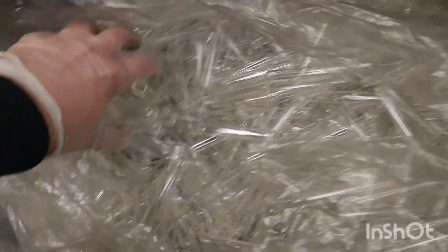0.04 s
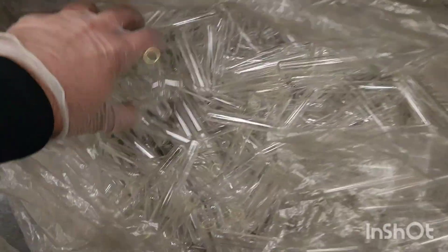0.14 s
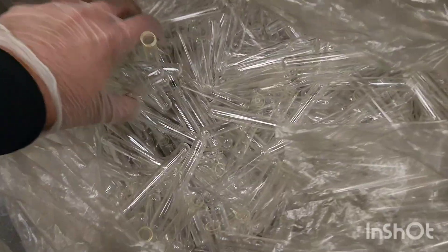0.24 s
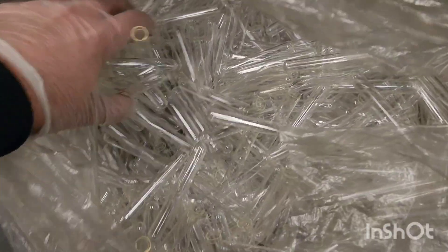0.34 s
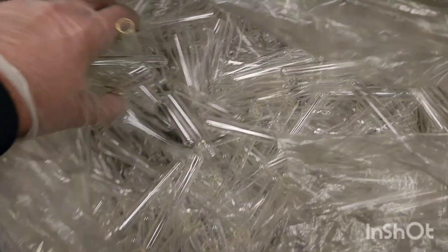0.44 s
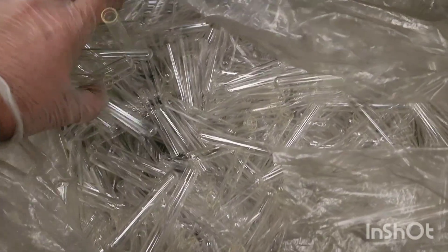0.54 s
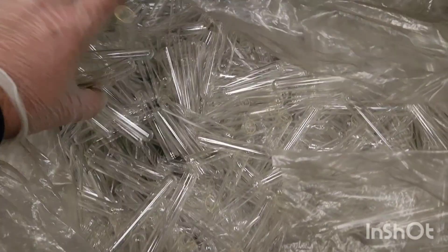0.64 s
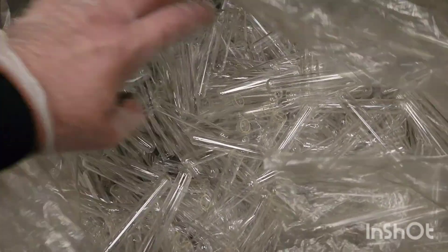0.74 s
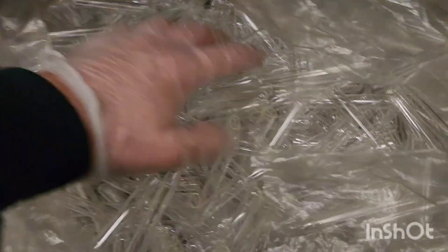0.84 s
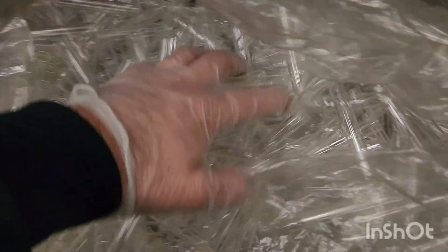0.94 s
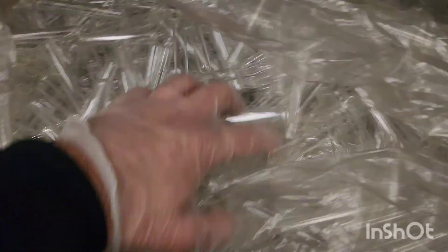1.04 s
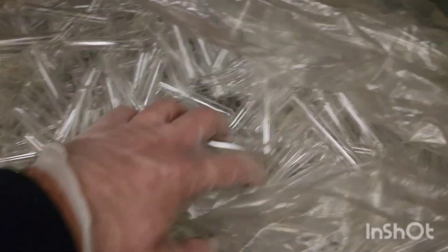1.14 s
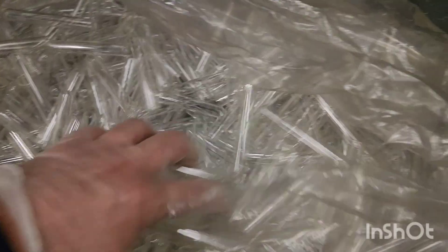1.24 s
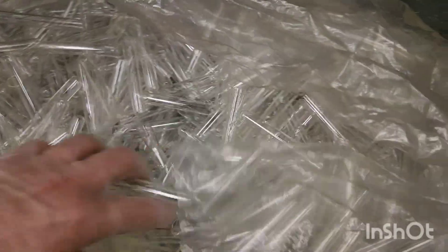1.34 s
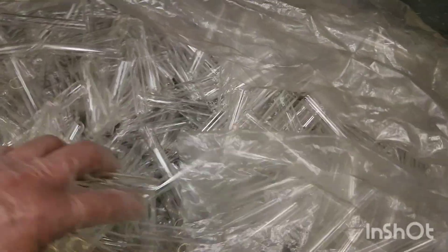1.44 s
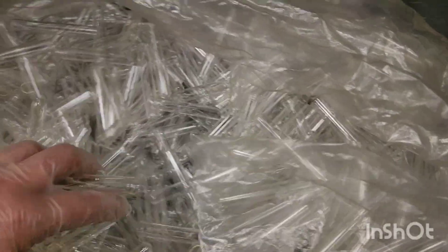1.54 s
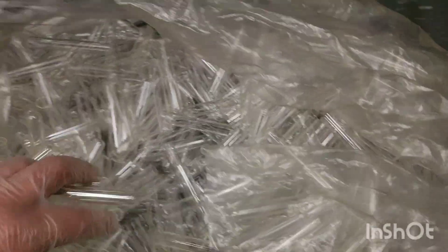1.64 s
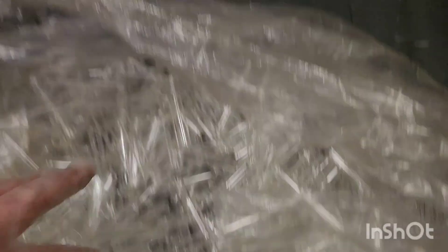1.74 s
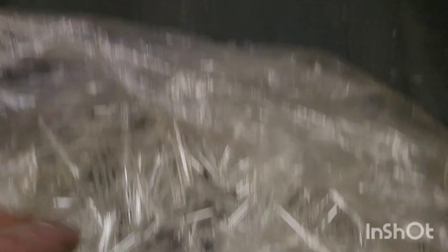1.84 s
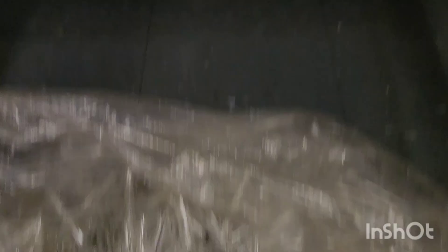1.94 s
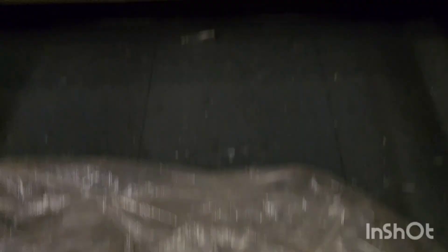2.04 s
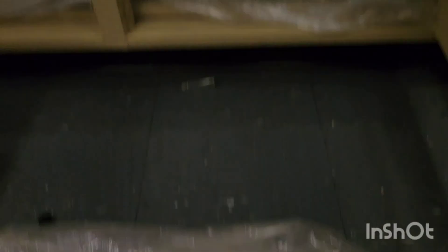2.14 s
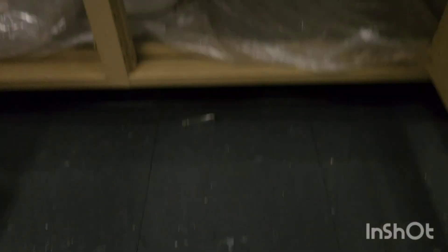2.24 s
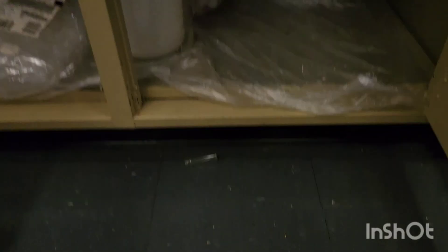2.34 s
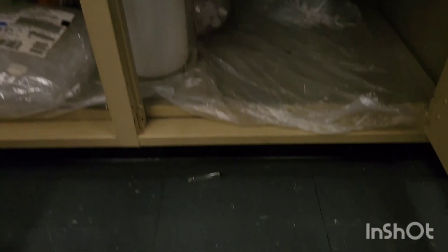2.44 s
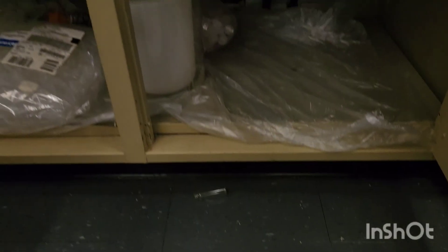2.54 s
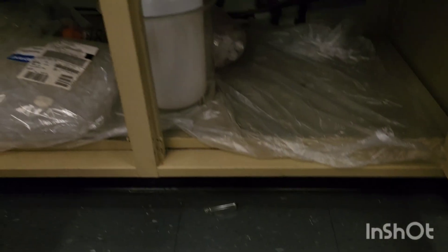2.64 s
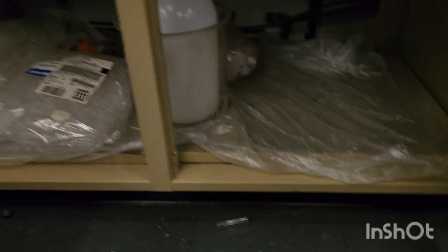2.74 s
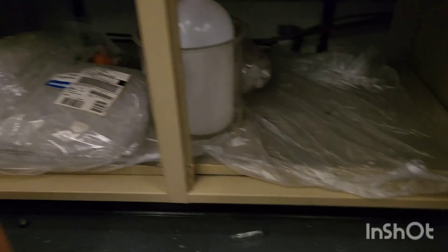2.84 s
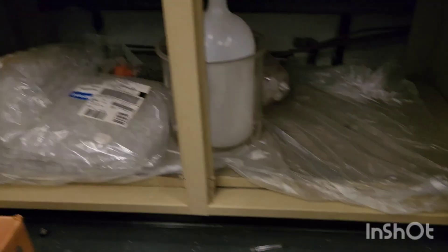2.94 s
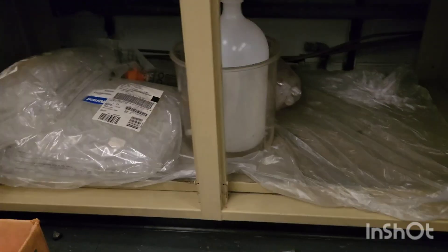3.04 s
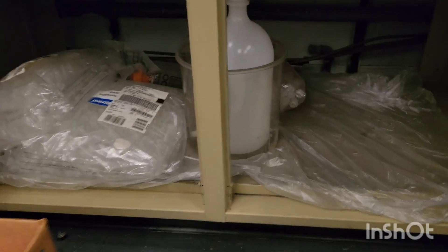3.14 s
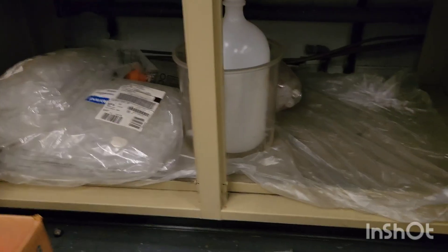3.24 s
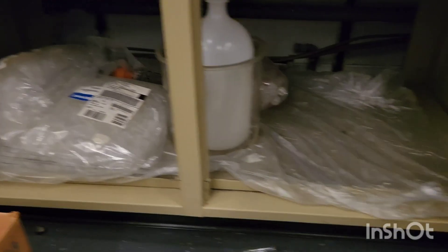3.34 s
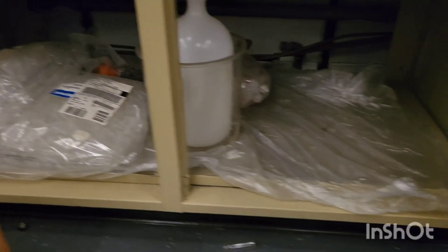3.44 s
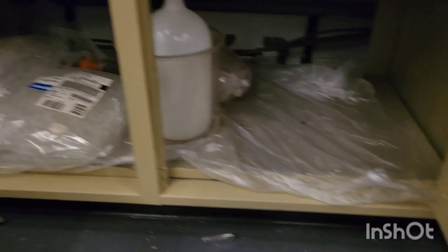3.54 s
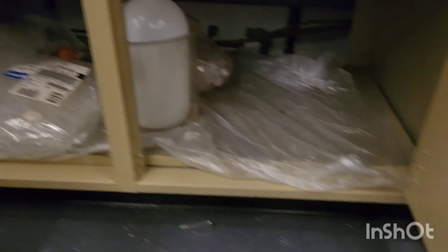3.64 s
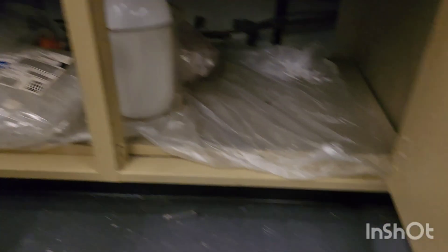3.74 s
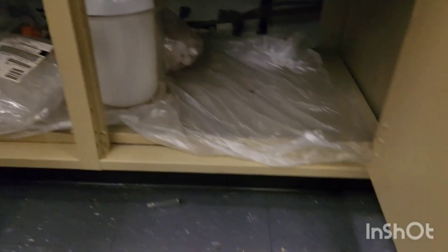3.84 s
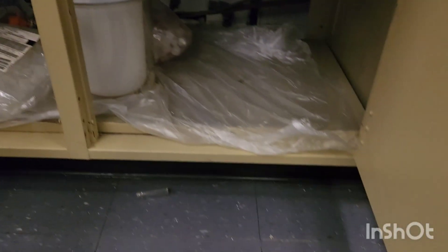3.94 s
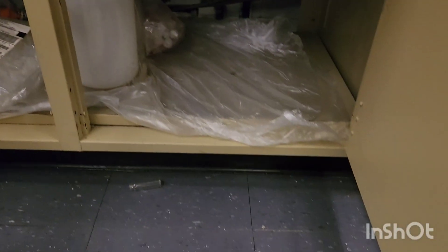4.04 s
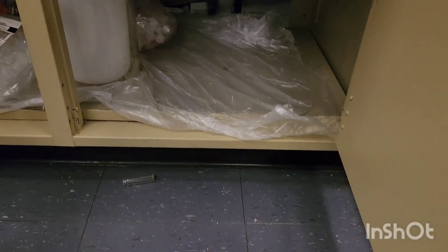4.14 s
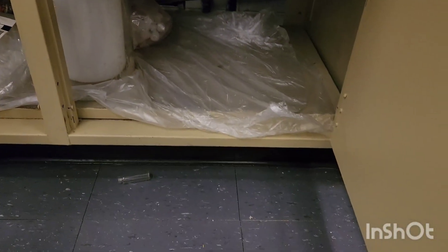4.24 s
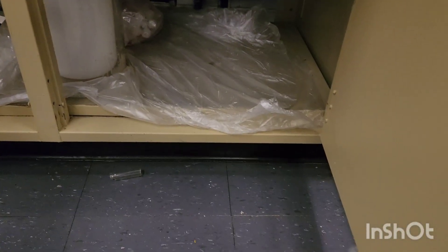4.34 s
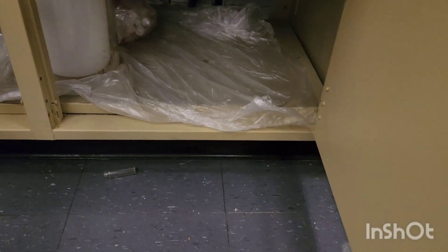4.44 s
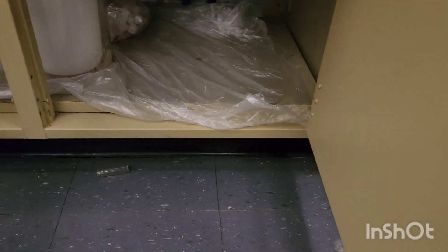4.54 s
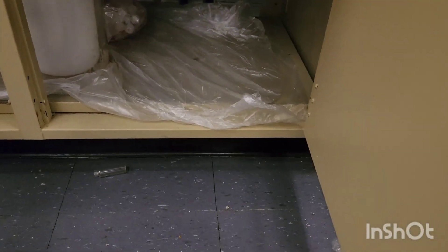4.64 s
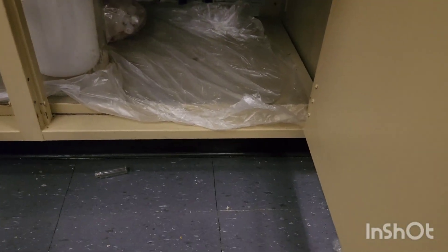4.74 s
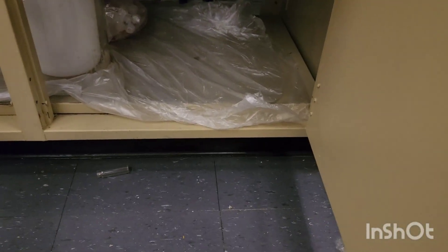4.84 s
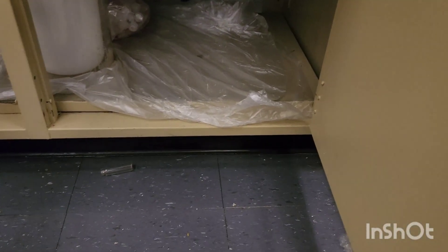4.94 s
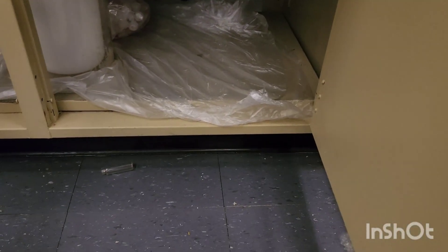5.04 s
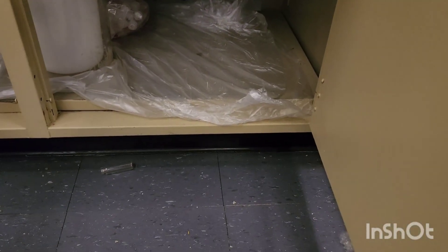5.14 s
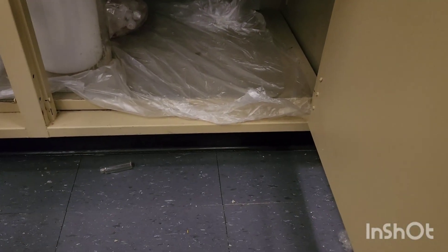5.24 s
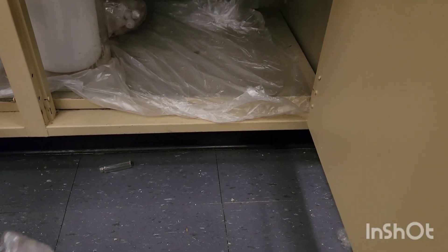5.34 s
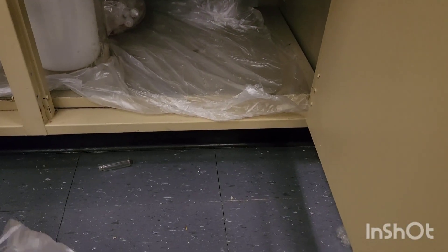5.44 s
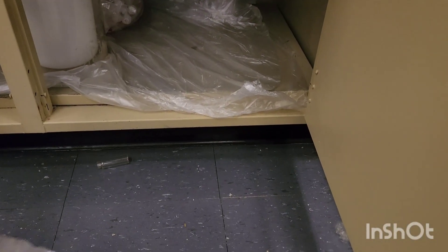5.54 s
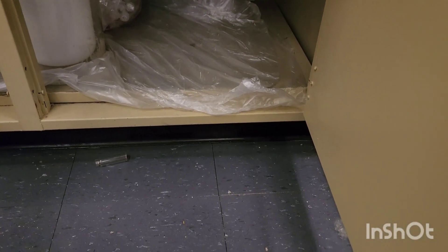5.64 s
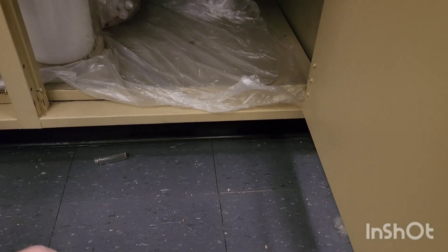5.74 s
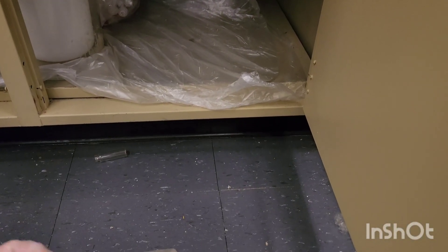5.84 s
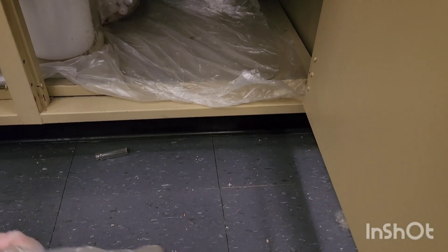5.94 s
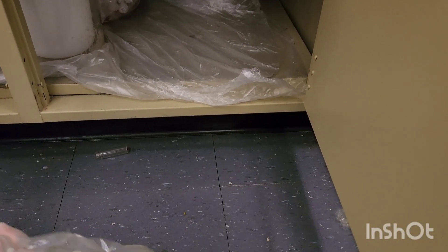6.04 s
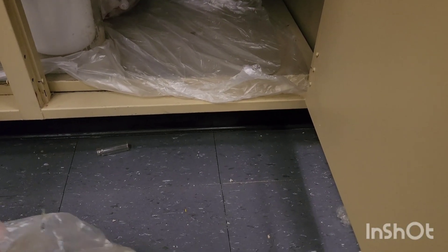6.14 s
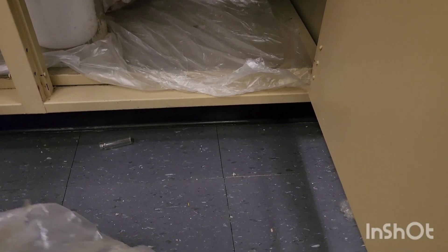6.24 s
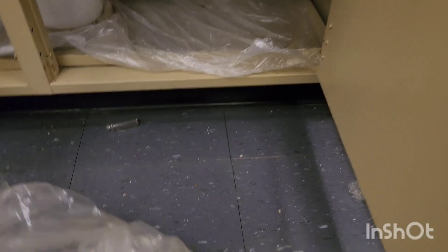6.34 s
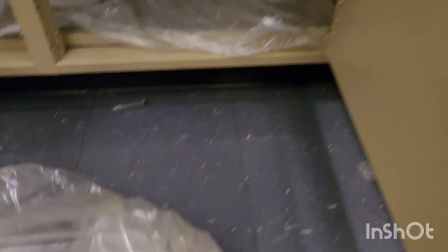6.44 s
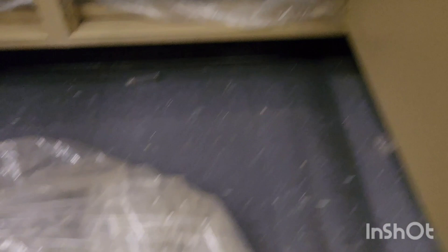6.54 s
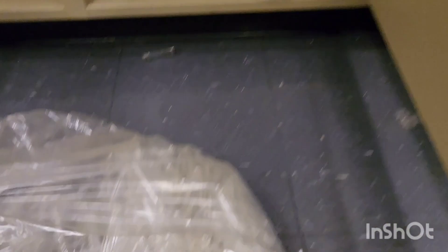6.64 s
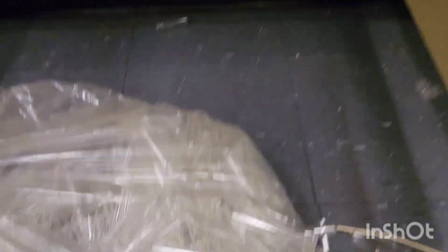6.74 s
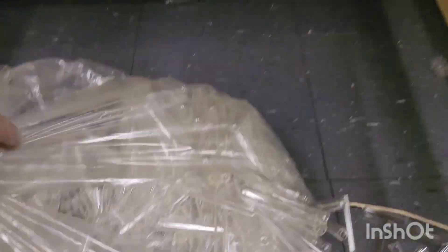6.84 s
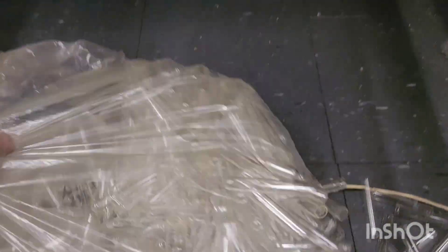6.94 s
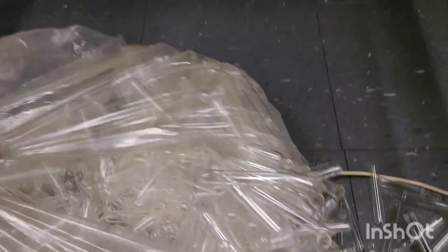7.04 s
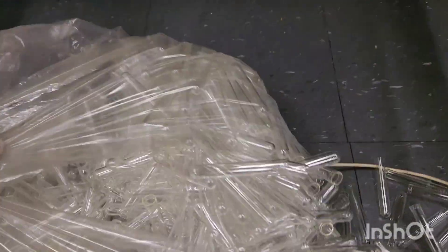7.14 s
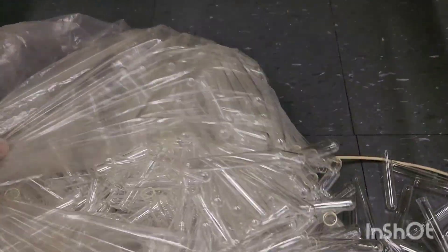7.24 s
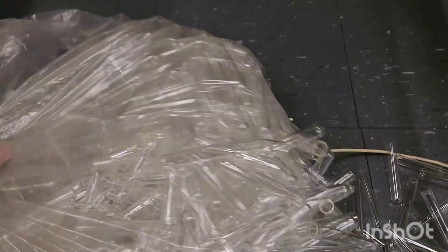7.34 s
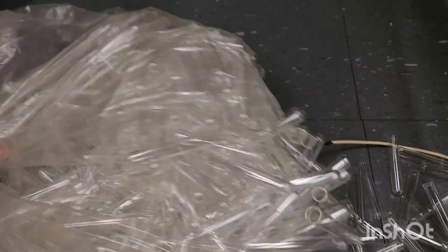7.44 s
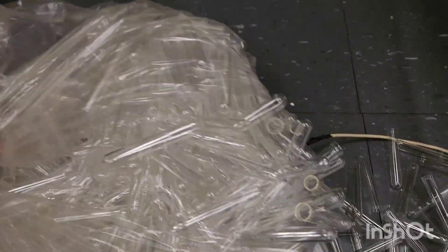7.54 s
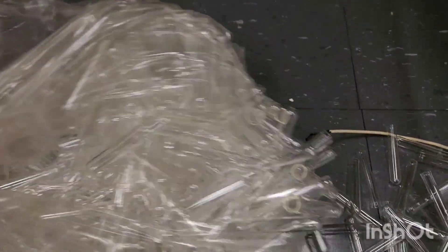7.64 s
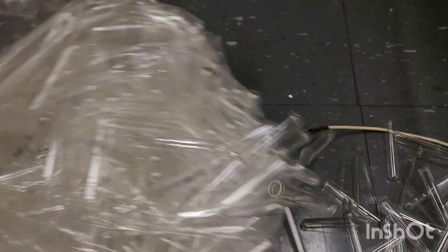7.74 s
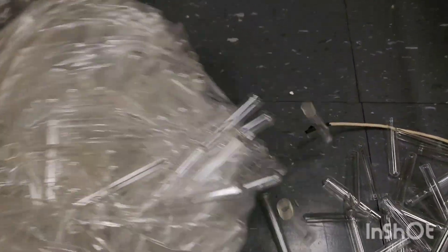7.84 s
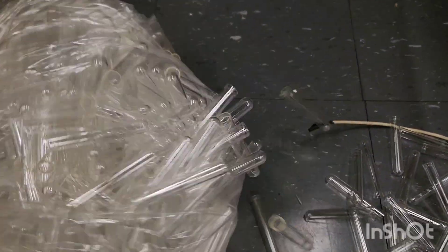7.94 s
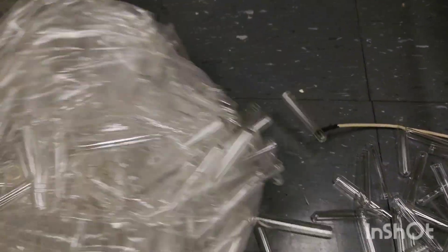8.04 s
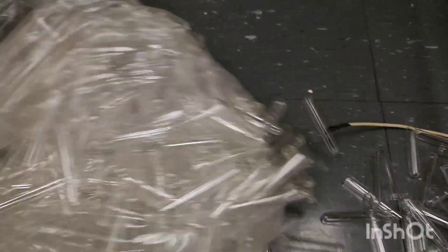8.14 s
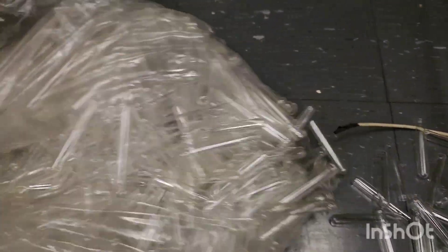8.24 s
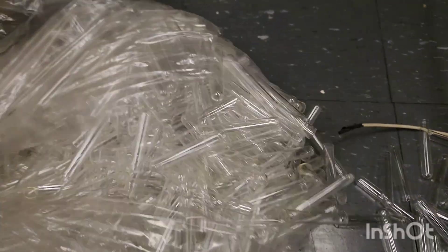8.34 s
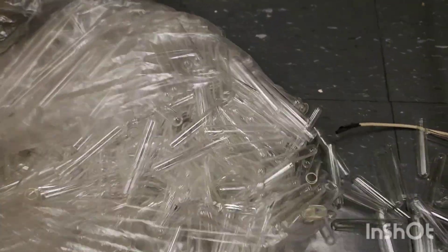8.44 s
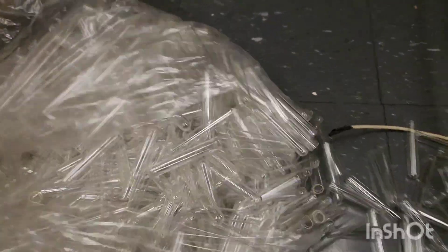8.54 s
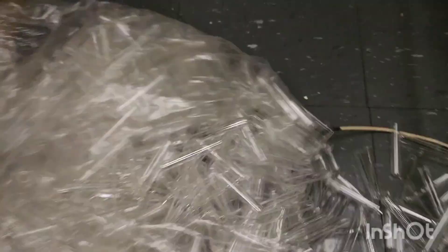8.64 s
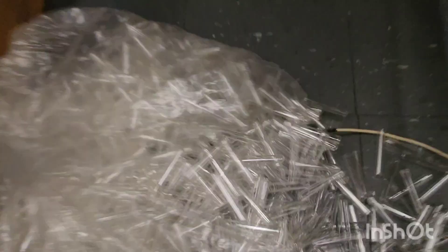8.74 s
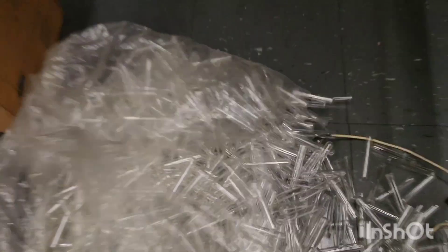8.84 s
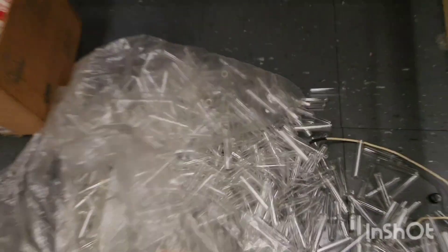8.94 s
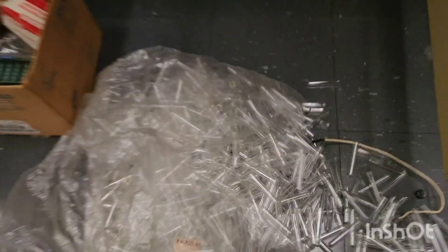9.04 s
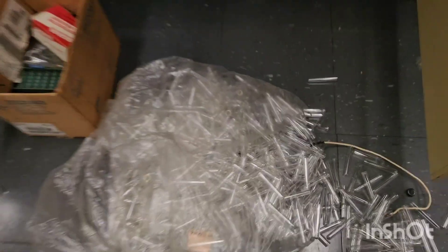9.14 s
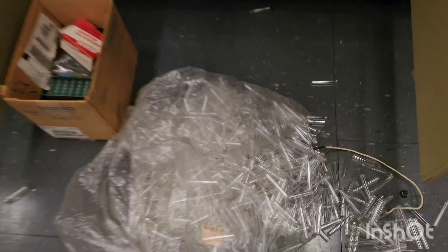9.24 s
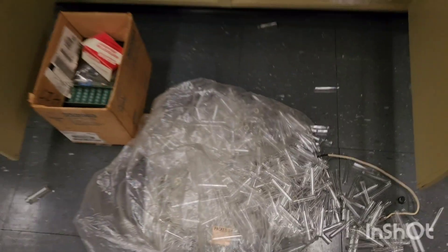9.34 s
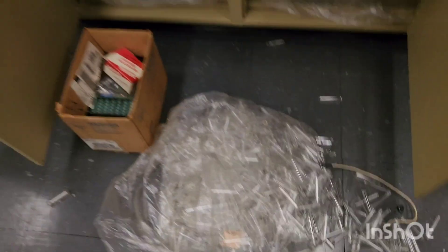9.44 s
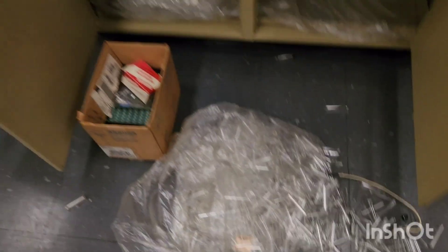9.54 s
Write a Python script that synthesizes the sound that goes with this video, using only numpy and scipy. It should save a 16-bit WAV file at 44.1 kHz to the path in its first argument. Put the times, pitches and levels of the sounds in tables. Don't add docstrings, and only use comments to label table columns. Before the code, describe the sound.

Bright, dense glassy rattling and plastic crinkle in two bouts, split by a quiet gap with soft taps and cloth swishes.

```python
import sys
import numpy as np
from scipy import signal
from scipy.io import wavfile
from scipy.ndimage import uniform_filter1d

SR = 44100
rng = np.random.default_rng(int(sys.argv[2]) if len(sys.argv) > 2 else 0)


def digitize_waveform(pressure):
    field = np.atleast_2d(pressure).T
    bounded = np.clip(field, -1, 1)
    quanta = np.round(bounded * 32767).astype(np.int16)
    wavfile.write(sys.argv[1], SR, quanta)


def convert_level_to_amplitude(level_db):
    exponent = np.asarray(level_db, float) / 20
    return 10 ** exponent


N = 423360
TIME = np.arange(N) / SR
HZ = np.fft.rfftfreq(4096, 1 / SR)

# [t/s, blow level/dB, crunch of film level/dB]
STIRRING = [(.0393, -14.5, -33), (.0627, -19, -27), (.1286, -5, -31), (.3176, -23.5, -23),
            (.3581, -23, -12.5), (.3813, -9, -21), (.458, -20, -15.5), (.4878, -20.5, -11),
            (.5179, -10.5, -21.5), (.538, -8, -48), (.5643, -11, -24), (.712, -26, -17),
            (.7263, -13.5, -21.5), (.7672, -13, -25), (.8056, -7.5, -28), (.9133, -16, -6.5),
            (1.0796, -17, -43), (1.1651, -11.5, -20), (1.247, -16.5, -12.5), (1.3083, -19, -8.5),
            (1.4837, -14.5, -16), (1.6821, -12.5, -24), (1.8145, -17.5, -17), (1.9072, -18.5, -24.5),
            (1.972, -24, -25)]
SETTLING = [(2.013, -33, -16), (2.0222, -30.5, -20), (2.115, -26.5, -20), (2.261, -51, -5),
            (2.3399, -32, -14.5), (2.378, -29.5, -21), (2.4205, -35, -26), (2.467, -41, -8),
            (2.482, -34.5, -17.5), (2.5187, -36.5, -17), (2.5615, -32, -17), (2.72, -45.5, -15),
            (2.757, -50, -12), (2.85, -40, -26), (3.3393, -41.5, -18), (3.435, -46.5, -15),
            (3.7612, -18, -15.5), (3.7868, -17.5, -11.5), (3.813, -18, -14), (3.8754, -17.5, -16.5),
            (3.974, -26, -22), (4.0417, -30, -16), (4.0853, -25, -11), (4.108, -21.5, -20),
            (9.1994, -51, -16), (9.262, -39, -29), (9.42, -48, -13), (9.549, -53, -12)]
GATHERING = [(4.507, -23.5, -30), (4.672, -21, -29), (4.7078, -25, -6.5), (4.799, -24, -20),
             (4.901, -11.5, -22.5), (5.011, -10, -27.5), (5.206, -26.5, -2.5), (5.23, -13.5, -14),
             (5.3305, -15, -23), (5.4784, -13, -13.5), (5.525, -5, -28), (5.799, -28, -34),
             (5.832, -18, -20), (5.8882, -9, -33), (5.988, -19.5, -11.5), (6.0032, -6.5, -27),
             (6.026, -6.5, -24), (6.0826, -10, -22), (6.1128, -6.5, -27), (6.2154, -7.5, -37),
             (6.3101, -8.5, -27), (6.5194, -34, -36)]
HAULING = [(6.7905, -8.5, -25), (6.9424, -13.5, -18), (7, -22, -12), (7.0962, -19, -18), (7.1204, -8, -29),
           (7.292, -18.5, -12.5), (7.324, -13, -20), (7.409, -32, -27), (7.426, -11, -40),
           (7.508, -15.5, -26), (7.6453, -21, -10.5), (7.7377, -27, -28), (7.876, -12, -17),
           (7.939, -14.5, -22), (8.0293, -13, -17), (8.094, -20, -19), (8.2127, -17.5, -47),
           (8.3905, -15, -32), (8.5188, -15, -23), (8.568, -20, -19), (8.613, -25, -15),
           (8.6558, -11.5, -27), (8.951, -43, -36)]
JOLTS = STIRRING + SETTLING + GATHERING + HAULING
# [f/Hz, spread between tubes/Hz, t60/s]
TUBE_MODES = [(1065, 45, .028), (4180, 22, .07), (4320, 110, .016), (4700, 260, .009), (7020, 90, .025),
              (8740, 110, .025), (9625, 40, .045), (10080, 120, .02), (11930, 130, .025), (12830, 70, .03),
              (14860, 90, .03), (15715, 35, .04), (6300, 400, .004), (7700, 450, .004), (10900, 550, .004),
              (12400, 250, .005), (15300, 250, .005)]
# [t/s, brightness level/dB]
FACING = [(0.0, 1), (.9, 4.5), (1.3, 5), (2.1, 3.5), (2.5, 1), (3.8, -2.5), (4.4, -2.5), (5.0, -3.5),
          (5.45, -3), (5.9, 3), (6.7, 3), (6.95, -5), (7.9, -3), (8.1, 2.5), (9.0, 5), (9.6, -6)]


def evened(x):
    return x / np.sqrt(np.mean(x ** 2) + 1e-20)


def read(points, hz):
    f, value = np.transpose(points)
    return np.interp(np.log(hz + 1), np.log(f + 1), value)


def add(mix, s, sound):
    part = mix[:, round(s * SR):][:, :sound.shape[1]]
    part += sound[:, :part.shape[1]]


def causal(db, size=1024):
    log_gain = np.log(convert_level_to_amplitude(np.r_[db, db[-2:0:-1]]))
    return np.fft.ifft(np.exp(np.conj(signal.hilbert(log_gain)))).real[:size]


def brightness_db(t):
    return np.interp(t, *np.transpose(FACING))


def effort_db(glass):
    # [full effort from t/s, held for/s, film crackle level/dB, glass rattle level/dB]
    strokes = [(0.0, 0.22, -32.5, -32), (0.389, 0.0043, -41, -45), (.53, 0.0091, -33, -44),
               (.72, 0.035, -35.5, -24.5), (0.954, 0.15, -26.5, -16), (1.288, 0.13, -28.5, -17.5),
               (1.52, 0.037, -34, -24), (1.72, 0.06, -35, -18.5), (2.0, 0.092, -61, -49),
               (2.94, 0.081, -64, -73), (3.5, .2, -79, -78), (3.792, 0.087, -44, -54),
               (3.95, 0.11, -38.5, -39), (4.2, 0.095, -71, -67), (4.452, 0.088, -35, -55),
               (4.749, 0.1, -29, -26), (4.98, 0.13, -35, -32), (5.252, .4, -28.5, -22.5),
               (5.799, 0.16, -26, -17.5), (6.102, .5, -30, -21), (6.896, 0.23, -25, -18),
               (7.349, 0.073, -26, -21), (7.75, 0.12, -27.5, -25), (8.04, 0.16, -28, -18.5),
               (8.598, 0.16, -31.5, -17), (8.92, 0.025, -39, -24), (9.138, 0.0047, -44.5, -31),
               (9.29, 0.015, -76, -58)]
    start, held, film_db, glass_db = np.array(strokes).T[:, :, None]
    swell_s, ease_s = (0.15 * 0.93, 0.1) if glass else (0.15, 0.1)
    peak_db, steepness, rest_db = (glass_db, 1.29, -77) if glass else (film_db, 1.0, -64.5)
    t = np.arange(0, N + 256, 128) / SR
    before = np.maximum(start - t, 0) / swell_s
    after = np.maximum(t - start - held, 0) / ease_s
    fall_db = 10 * steepness * (before + after) ** 0.94
    power = convert_level_to_amplitude(2 * (peak_db - fall_db)).sum(0) + convert_level_to_amplitude(2 * rest_db)
    return np.interp(TIME, t, 10 * np.log10(power))


def air():
    # [f/Hz, level per Hz/dB]
    air_spectrum = [(12, -52), (25, -4), (50, 3), (75, -2), (146, -5.5), (234, -12), (388, -12), (542, -17),
                    (660, -17.5), (2670, -29.5), (4300, -51), (6720, -33.5), (12100, -43), (16000, -29)]
    # [f/Hz, likeness 0 to 1]
    coherence = [(30, .92), (60, .8), (125, .66), (240, .55), (950, .3), (15000, 0.0)]
    # [t/s, level/dB]
    tremor = [(0.0, -49.5), (1.7, -54), (2.2, -50.5), (4.5, -52.5), (5.099, -54), (7.7, -49.5),
              (8.4, -56.5), (9.5, -57.5), (9.6, -45)]
    frames, hz = N // 256 + 5, np.fft.rfftfreq(1024, 1 / SR)
    a, b, c, d, patches = rng.standard_normal((frames, 513, 5)).T
    patches = evened(uniform_filter1d(uniform_filter1d(patches, 8, 0), 12, 1))
    same = np.clip(read(coherence, hz), -1, 1)[:, None]
    left = a + 1j * b
    right = same * left + np.sqrt(1 - same ** 2) * (c + 1j * d)
    when = np.arange(frames) * 256 / SR
    rumble_db = np.interp(when, *np.transpose(tremor)) + 54.5
    grip_db = 2.0 + 0.34 * (np.interp(when - .012, TIME, effort_db(glass=0)) + 37.0)
    low = np.exp(-(hz / 130) ** 4)[:, None]
    grip = np.exp(-np.log((hz + 1) / 230) ** 2 / .5)[:, None]
    lift_db = low * rumble_db + (1 - low) * grip * grip_db
    level_db = read(air_spectrum, hz)[:, None] + (4.5 - 2.5 * low) * patches + lift_db
    z = np.array([left, right]) * convert_level_to_amplitude(level_db)
    return convert_level_to_amplitude(6.5) * signal.istft(z, nperseg=1024, noverlap=768)[1][:, :N] / 1024


def room(x, t60=0.052, count=500, size=4):
    out, turn = np.zeros_like(x), TIME * 3
    for k in range(size):
        taps = np.zeros((2, 22 * count + 100))
        at = 90 + 22 * np.arange(count) + rng.integers(0, 22, (2, count))
        echoes = rng.choice([-1., 1.], at.shape) * convert_level_to_amplitude(-60 * at / SR / t60)
        np.put_along_axis(taps, at, echoes, 1)
        share = np.cos(np.pi / 2 * np.clip(abs((turn - k) % size - 1), 0, 1))
        out += signal.oaconvolve(x * share, taps / np.linalg.norm(taps[0]), axes=1)[:, :N]
    return out


def sleeve():
    # [t/s, length/s, level/dB]
    brushes = [
        (2.62, 0.051, -55),
        (2.92, 0.079, -42.5),
        (3.148, 0.039, -42),
        (3.192, 0.046, -44),
        (3.649, 0.18, -44),
        (4.311, 0.088, -43),
        (4.415, 0.12, -30),
    ]
    out = np.zeros((2, N))
    for s, length, db in brushes:
        shape = signal.windows.tukey(round(length * SR), .8)
        add(out, s, convert_level_to_amplitude(db) * shape * rng.standard_normal((2, 8000))[:, :len(shape)])
    return out


def handling():
    # [t/s, tick level/dB, thump level/dB, nail snap level/dB]
    touches = [(2.196, -35, -40, -13), (2.377, -32, -59, 3), (2.671, -39.5, -50, -30),
               (2.904, -31, -49, -26), (2.923, -27, -36, -3), (2.956, -37, -56, -5),
               (2.96, -23.5, -43, -25), (2.987, -30, -50, -18), (3.058, -35, -43, -21),
               (3.081, -29, -43, -32), (3.162, -28, -38, -22), (3.538, -40, -65, -47),
               (3.585, -28, -55, -48), (3.617, -21.5, -57, -30), (3.7637, -9, -37, -23),
               (4.193, -17.5, -47, -31), (4.246, -19.5, -31, -9), (4.574, -11, -30.5, 4),
               (4.923, -15, -48, -16), (6.463, -13, -29.5, -17), (8.55, -10, -32, -10),
               (9.369, -37, -64, -30)]
    # [f/Hz, level/dB]
    case_spectrum = [(100, -2), (300, 10.5), (700, 6.5), (1500, 0), (3000, -4.5), (5000, -5), (8000, -16),
                     (16000, -78)]
    out, t = np.zeros((2, N)), np.arange(1024) / SR
    tick = causal(read(case_spectrum, HZ))
    push = np.sin(2 * np.pi * 110 * t) * np.exp(-t / 0.0042) * (1 - np.exp(-t / 0.0028))
    for (s, db, thump_db, snap_db), spot in zip(touches, rng.random(len(touches))):
        tone = np.sin(2 * np.pi * 400 * 4 ** spot * t) * np.exp(-t / 0.0026)
        knock = tick / abs(tick).max() - 0.17 * tone
        knock[:3] += convert_level_to_amplitude(np.minimum(snap_db, -2) - 2) * np.array([1, -2, 1])
        lift = round(6 + 5 * spot)
        knock[lift:] -= .7 * knock[:-lift].copy()
        sides = convert_level_to_amplitude([[-1.5], [1.5]])
        add(out, s + 0.0035, convert_level_to_amplitude(db + 4.5) * knock * sides + convert_level_to_amplitude(thump_db + 9.5) * push)
    return out


def film(count=10, per_s=4000., spread_db=1.5):
    # [f/Hz, level/dB]
    film_spectrum = [(200, -20.5), (400, -14), (800, -4), (1100, -2), (2000, 3), (3000, 6), (3400, 5),
                     (4600, 8.5), (5800, -4.5), (8000, -8.5), (12000, -9), (13700, -1), (16000, -17.5)]
    size = convert_level_to_amplitude(spread_db * np.minimum(rng.exponential(1, N), 5))
    snap = size * (rng.random(N) < per_s / SR) * rng.choice([-1, 1], N)
    patch, out = rng.integers(0, count, N), np.zeros((2, N))
    for k in range(count):
        delays = [(k - count // 2) * side * 4 // count * 2 for side in (1, -1)]
        out += [np.roll(snap * (patch == k), delay) for delay in delays]
    power = convert_level_to_amplitude(2 * (effort_db(glass=0) + 1.0))[None]
    t = np.arange(3000) / SR
    for s, db, crunch_db in JOLTS:
        add(power, s, convert_level_to_amplitude(2 * (db + crunch_db + 6.0 - 60 * t / 0.16))[None])
    colour = causal(read(film_spectrum, HZ))[None]
    out = signal.oaconvolve(evened(out) * np.sqrt(power), colour)[:, :N]
    dull = signal.sosfilt(signal.butter(2, 5500, fs=SR, output="sos"), out)
    body = signal.sosfilt(signal.butter(2, [1300, 2900], "band", fs=SR, output="sos"), colour)
    return (dull + (out - dull) * convert_level_to_amplitude(0.77 * brightness_db(TIME))) / np.linalg.norm(body)


def rolling(count=4):
    # [t/s, length/s, level/dB]
    rolls = [
        (7.45, 0.29, -25.5),
        (7.755, 0.07, -18),
        (8.232, 0.075, -13.5),
        (8.385, 0.12, -17.5),
        (8.62, 0.36, -23.5),
        (9.084, 0.079, -25),
    ]
    t60, per_s = 0.31, 98
    out, t, gate = np.zeros((2, N)), np.arange(6000) / SR, np.zeros((1, N))
    for s, length, db in rolls:
        add(gate, s, convert_level_to_amplitude(db) * np.ones((1, round(length * SR))))
    for detune, phase in rng.standard_normal((count, 2)):
        taps = gate * (rng.random(N) < per_s / count / SR) * rng.uniform(0.69, 1, N)
        turn = 2 * np.pi * (4200 + 14 * detune) * t + np.c_[[0, phase]]
        overtones = convert_level_to_amplitude(-21.0) * (np.sin(2.3 * turn) + np.sin(2.86 * turn)) * convert_level_to_amplitude(-90 * t / t60)
        ring = (np.sin(turn) + overtones) * convert_level_to_amplitude(-60 * t / t60)
        out += signal.oaconvolve(taps, ring, axes=1)[:, :N]
    return out


def pings():
    # [t/s, level/dB, f/Hz]
    notes_of_air = [
        (0.9333, -23, 1050),
        (6.622, -21, 1060),
        (7.642, -23, 1165),
        (7.837, -23, 1200),
        (7.9388, -21.5, 1150),
        (8.576, -27, 1180),
    ]
    out, t = np.zeros((2, N)), np.arange(4000) / SR
    for s, db, hz in notes_of_air:
        fade = convert_level_to_amplitude(db + 0.5 - 60 * t / 0.064) * (1 - np.exp(-t / 0.00098))
        add(out, s, fade[None] * np.sin(2 * np.pi * hz * t))
    return out


def tube(draw, uneven_db=3.5):
    mode_db = [-15.5, -1, 7.5, 2.5, -14, -13.5, -14, -12, -7.5, -22, -10.5, -12, -25.5, -10, -16, -17, -19]
    hz, spread, t60 = np.transpose(TUBE_MODES)[:, :, None]
    hz = hz + spread * draw[0]
    t = np.arange(2400) / SR
    damping = np.exp(.35 * draw[2])
    level_db = np.c_[mode_db] + uneven_db * draw[1] * np.minimum(hz / 4000, 1)
    fade = convert_level_to_amplitude(level_db - 60 * t / (t60 * damping)) * (1 - np.exp(-t / 0.00083))
    turns = draw[3], draw[3] + draw[4] * np.minimum(hz / 6000, 1)
    modes = np.array([fade * np.sin(2 * np.pi * (hz * t + turn)) for turn in turns])
    return np.array([modes[:, :4].sum(1), modes[:, 4:].sum(1)])


def tube_draws(count):
    return rng.standard_normal((count, 5, len(TUBE_MODES), 1))


def glints():
    # [t/s, level/dB, share of oval mode level/dB]
    rim_touches = [(0.2204, -14, 4), (0.36, -28, -1), (0.6539, -30, -3), (0.8355, -21, -3),
                   (0.8579, -16, -7), (0.8869, -30, -12), (1.213, -6, -8), (1.2376, -5, -3),
                   (1.593, -16, 2), (1.7599, -10.5, 4), (1.825, -9, -3), (1.8552, -11, 9),
                   (5.0704, -22, -3), (5.1253, -18, 2), (5.187, -33, 0), (5.5224, -12, -3),
                   (5.6935, -10, 5), (6.3086, -10, -1), (6.5665, -20, -3), (6.721, -12, 2),
                   (7.0693, -17, -1), (7.408, -9, -8), (7.56, -15.5, 5), (7.6331, -23, -8),
                   (8.0363, -7, -8), (8.362, -18, 8), (8.434, -13, 2), (8.4588, -4.5, -2)]
    out = np.zeros((2, N))
    for (s, db, oval_db), draw in zip(rim_touches, tube_draws(len(rim_touches))):
        low, high = tube(draw) * convert_level_to_amplitude(-60 * np.arange(2400) / SR / 0.071)
        add(out, s, convert_level_to_amplitude(db - 1.5) * (high / abs(high).max() + convert_level_to_amplitude(oval_db) * low / abs(low).max()))
    return out


def rings():
    # [t/s, level/dB, f/Hz, t60/s]
    clear_rings = [(0.4589, -25, 4230, 0.072), (1.681, -7, 4150, 0.089), (1.9076, -18.5, 4100, 0.074),
                   (1.9739, -10, 4190, 0.041), (3.9742, -18, 4190, 0.063), (4.6733, -16, 4280, 0.06),
                   (5.4772, -5, 4200, 0.08), (5.652, -12, 4290, 0.053), (5.8525, -8, 4190, 0.12),
                   (6.5187, -9, 4190, 0.074), (7.425, 1, 4150, 0.12), (7.5054, -14, 4124, 0.11),
                   (7.739, -8, 4170, 0.066), (8.2118, -5, 4155, 0.15), (8.612, -7, 4210, 0.066),
                   (9.112, -23, 4140, 0.099), (9.1405, -22.5, 4190, 0.063), (9.176, -24, 4200, 0.1),
                   (9.3746, -41, 4200, 0.08), (9.5402, -46, 4260, 0.08), (9.5914, -49, 4300, 0.08)]
    out, t = np.zeros((2, N)), np.arange(5000) / SR
    for (s, db, hz, t60), turn in zip(clear_rings, rng.standard_normal(len(clear_rings))):
        fade = convert_level_to_amplitude(db + 1.0 - 60 * t / np.clip(t60, .015, .3)) * (1 - np.exp(-t / 0.00045))
        add(out, s, fade * np.sin(2 * np.pi * hz * t + np.c_[[0, turn]]))
    return out


def rattle(stock, count=6500):
    lower, upper = np.zeros((2, 2, N))
    for when, which, hard in rng.random((count, 3)):
        low, high = (1 - .99 * hard) ** -.4 * stock[int(which * len(stock))]
        add(lower, when * N / SR, low)
        add(upper, when * N / SR, high)
    blows = lower + upper * convert_level_to_amplitude(brightness_db(TIME) - 4.5)
    return blows / lower.std() * convert_level_to_amplitude(effort_db(glass=1) + 2.5)


def clinks(stock, count=5):
    out = np.zeros((2, N))
    knocks = rng.random((len(JOLTS), count, 2))
    for (s, db, _), draw, knock in zip(JOLTS, tube_draws(len(JOLTS)), knocks):
        upper_db = -7.5 + 1.22 * brightness_db(s) - 0.22 * max(db, -28.)
        weight = convert_level_to_amplitude(db - 1.0) * np.array([1, convert_level_to_amplitude(upper_db)])[:, None, None]
        add(out, s, (weight * tube(draw, uneven_db=4.0)).sum(0))
        for late, which in knock:
            neighbour = (weight * stock[int(which * len(stock))]).sum(0)
            add(out, s + 0.017 * late, convert_level_to_amplitude(-2.0 - 10. * late) * neighbour)
    return out


def scene():
    stock = [tube(draw) for draw in tube_draws(150)]
    bag = film() + rolling() + pings() + glints() + rings() + rattle(stock) + clinks(stock)
    return air() + sleeve() + handling() + convert_level_to_amplitude(-11.5) * room(bag) + bag


def roll_off(x):
    return signal.sosfilt(signal.butter(12, 17160, fs=SR, output="sos"), x)


def record(dry):
    # [f/Hz, level/dB]
    port_tilt = [(60, -1), (250, -2.5), (600, -0.5), (1200, -5), (1800, -6), (3000, -12), (4200, -13.5),
                 (5000, -10.5), (5800, 0.5), (7000, 14), (8200, 9.5), (10000, 9), (12000, -1),
                 (15000, -0.5)]
    # [f/Hz, width/Hz, level/dB]
    hollows = [(3370, 130, -5), (6150, 400, -6), (11200, 400, -3), (13650, 520, -14)]
    tilt_db = read(port_tilt, HZ) / 2
    mid_db = 10 * np.log10(np.cosh(tilt_db * np.log(10) / 10))
    for hz, width, db in hollows:
        mid_db = mid_db - db * np.exp(-((HZ - hz) / width) ** 2)
    ports = np.array([causal(side * tilt_db - mid_db) for side in (1, -1)])
    ports[1] = np.roll(ports[1], 6)
    x = np.tanh(signal.oaconvolve(dry, ports, axes=1)[:, :N] / .9) * .9
    band_limit = signal.firwin(2047, 15770, window=("kaiser", 9), fs=SR)
    return roll_off(signal.oaconvolve(x, band_limit[None], "same"))


dry = scene()
out = record(dry)
digitize_waveform(out)
```